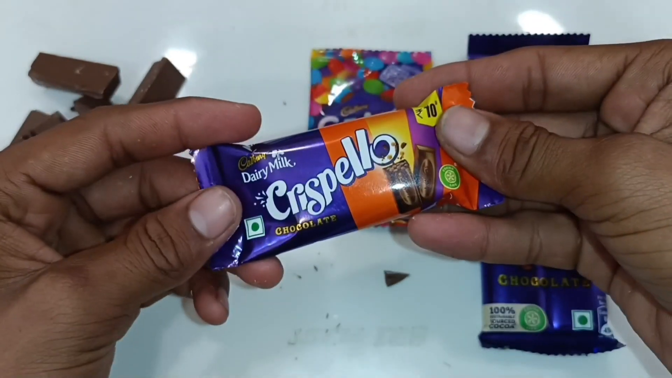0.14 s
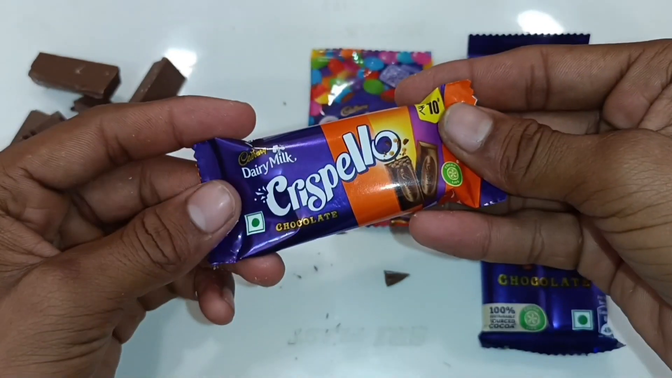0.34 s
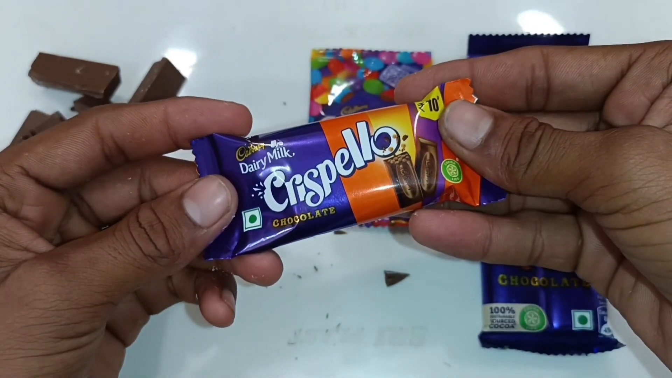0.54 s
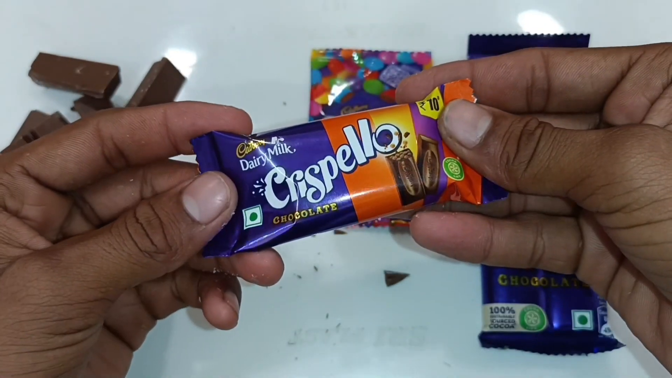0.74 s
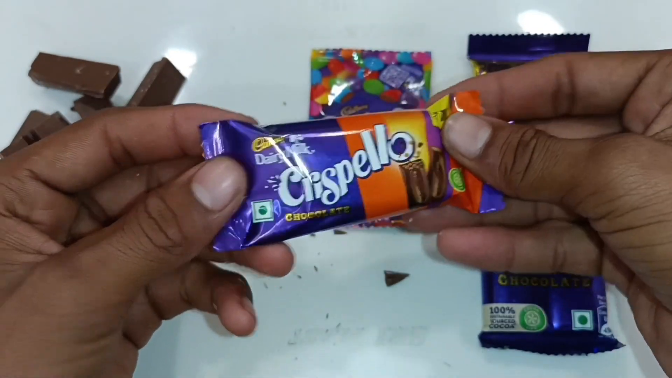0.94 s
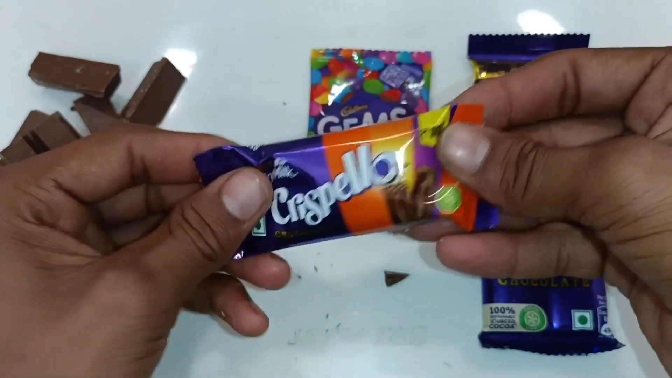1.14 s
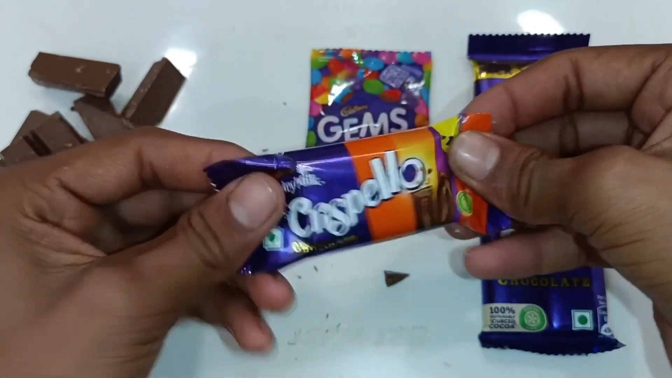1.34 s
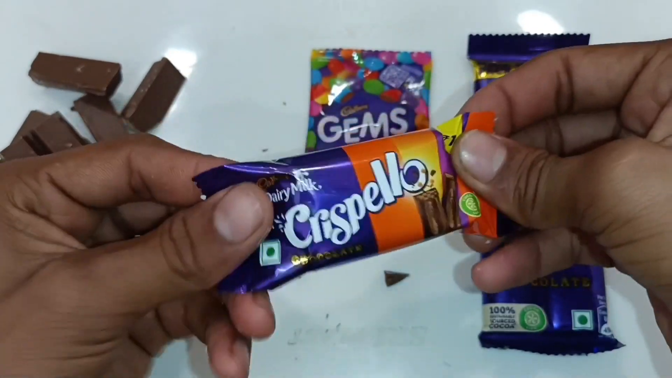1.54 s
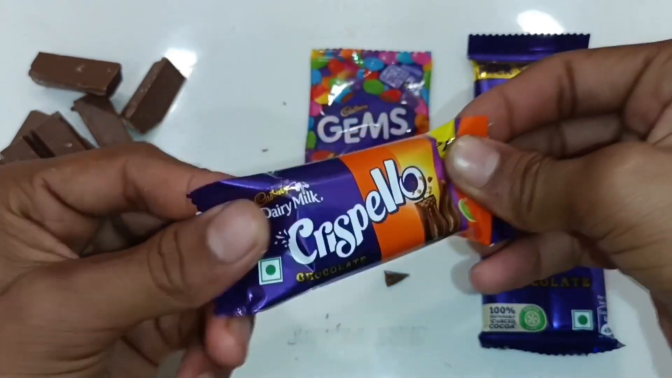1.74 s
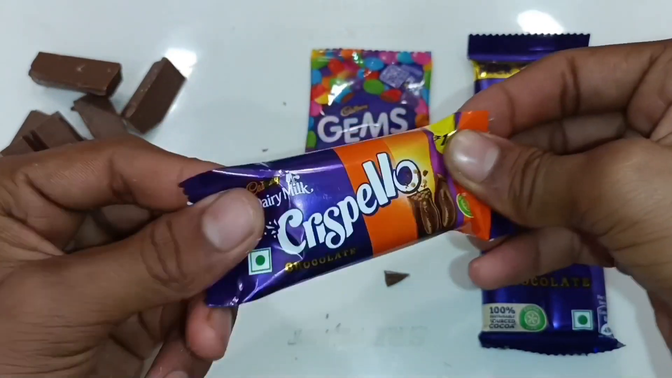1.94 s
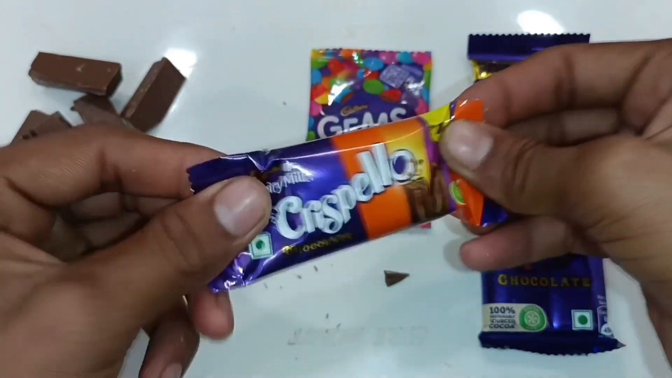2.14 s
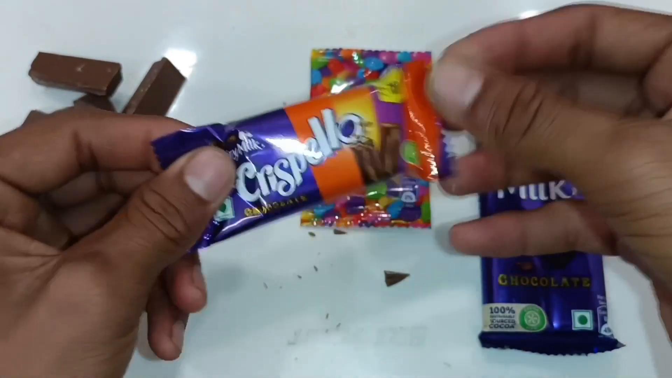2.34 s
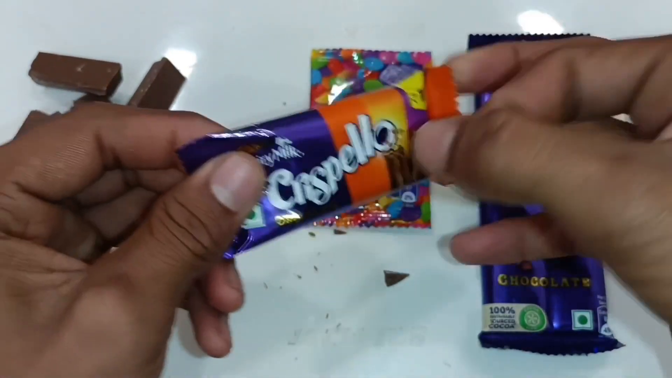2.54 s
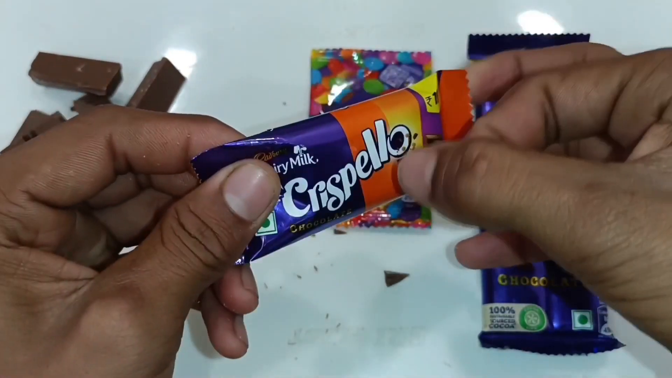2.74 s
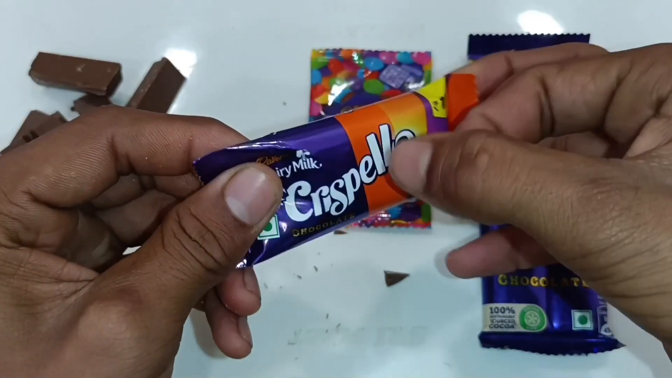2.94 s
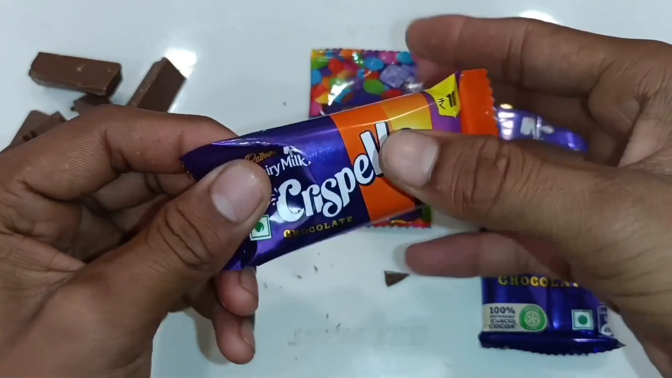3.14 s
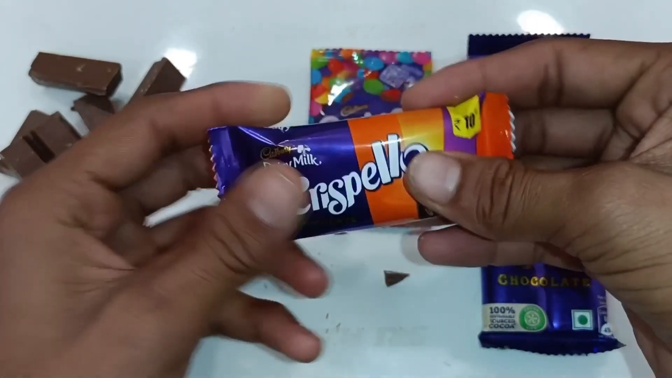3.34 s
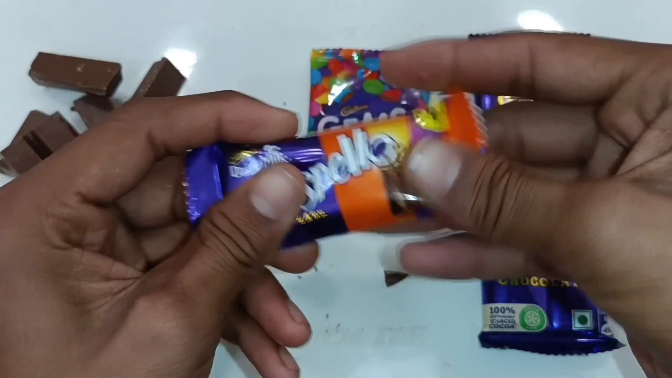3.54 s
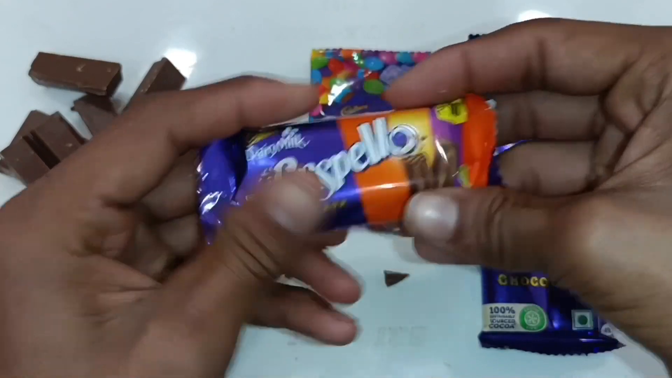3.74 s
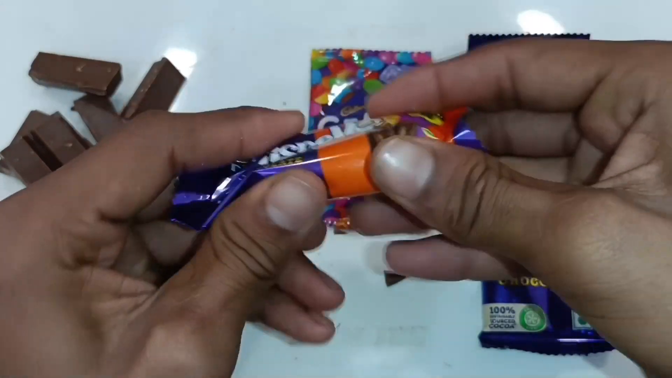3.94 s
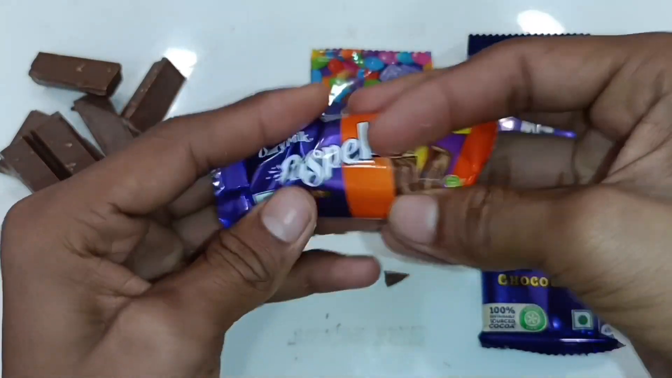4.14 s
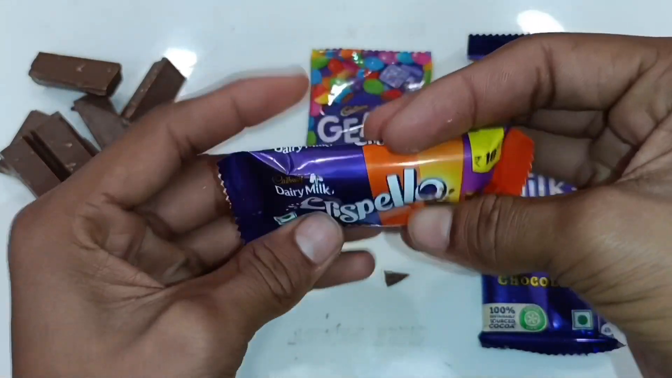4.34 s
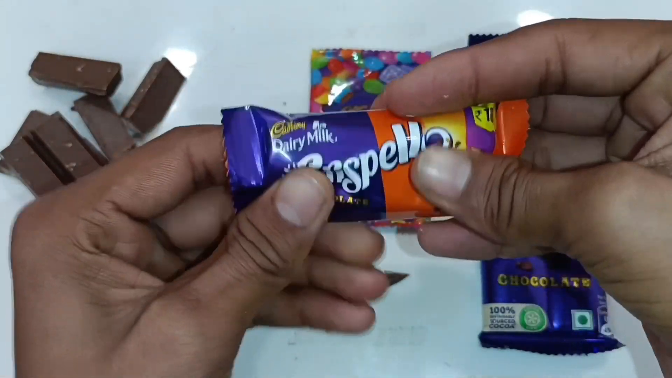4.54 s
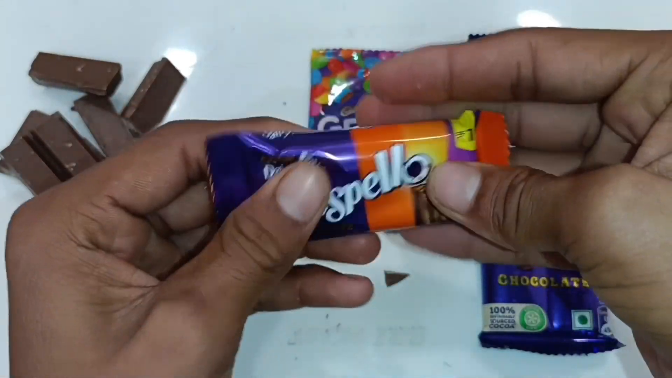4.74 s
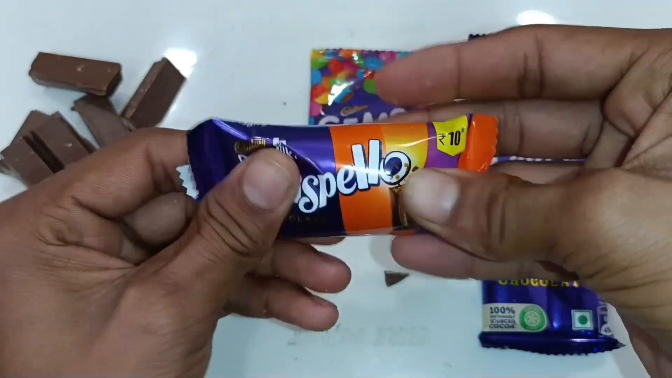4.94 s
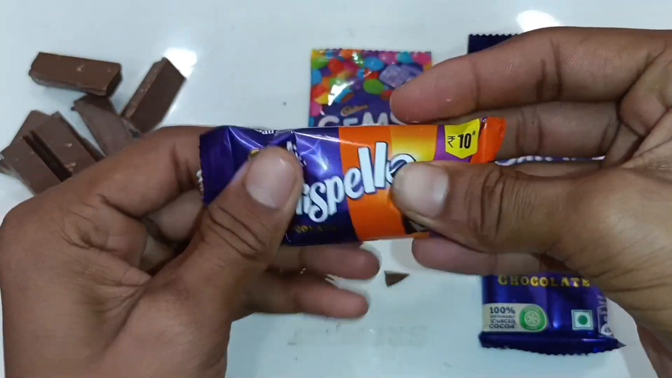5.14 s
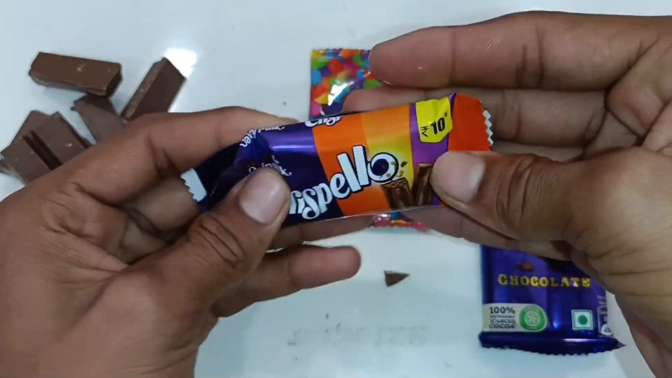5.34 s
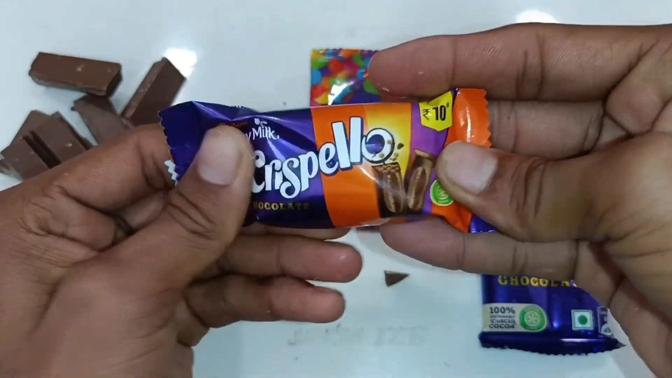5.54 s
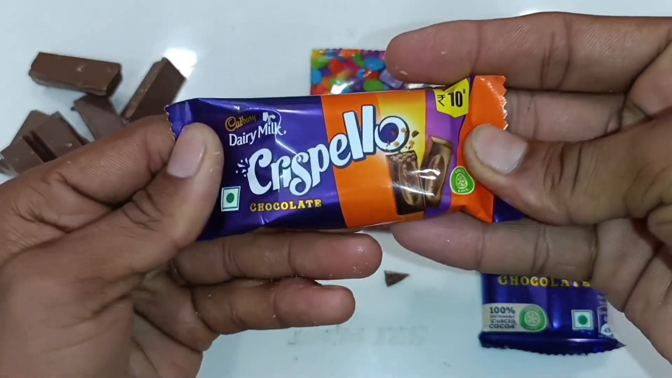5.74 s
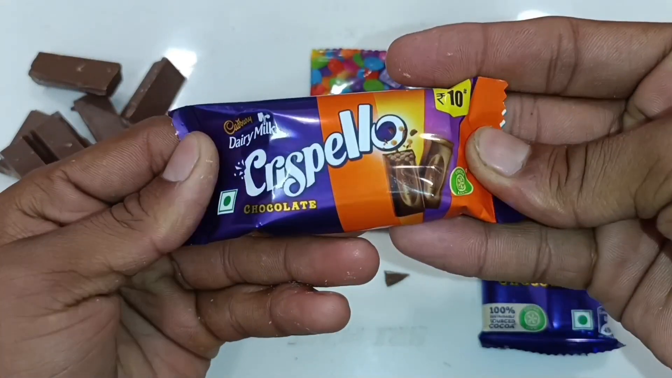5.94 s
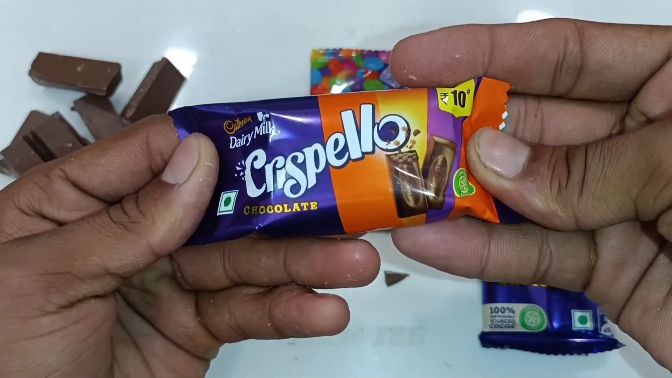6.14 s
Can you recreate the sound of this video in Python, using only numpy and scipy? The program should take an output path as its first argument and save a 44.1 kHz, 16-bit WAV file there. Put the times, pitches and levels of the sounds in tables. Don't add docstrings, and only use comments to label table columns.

```python
import sys
import numpy as np
from scipy import signal
from scipy.fft import rfft, irfft, next_fast_len
from scipy.io import wavfile
from scipy.ndimage import uniform_filter1d

SR = 44100
rng = np.random.default_rng(int(sys.argv[2]) if len(sys.argv) > 2 else 0)


def boost_factor(decibels):
    exponent = np.asarray(decibels, float) / 20
    return 10 ** exponent


def waveform_to_disk(signal):
    frames = np.transpose(np.atleast_2d(signal))
    scaled = np.clip(frames, -1, 1) * 32767
    samples = np.round(scaled).astype(np.int16)
    wavfile.write(sys.argv[1], SR, samples)


N = 272979
LENGTH = 1024
ATTACK = 0.0005

# frequency in Hz, level in dB per Hz.
FILM_COLOUR = [(180, -40), (300, -17), (1930, 11), (2560, -0.5), (2880, 7.5), (4530, -9.5), (8150, -3),
               (14400, -24), (16500, -36.5)]


def along(points, hz):
    f, v = np.transpose(points)
    return np.interp(np.log(hz + 1), np.log(f + 1), v)


def curve(rows):
    s, v = np.transpose(rows)
    return np.interp(np.arange(N) / SR, s, v)


def coloured(x, spectrum):
    m = next_fast_len(N + 8192)
    gain = boost_factor(along(spectrum, np.fft.rfftfreq(m, 1 / SR)))
    y = irfft(rfft(x, m) * gain, m)[:N]
    return y / np.sqrt(np.mean(y ** 2))


def resonance(f, hz, width_hz):
    return 1j * f * width_hz / (hz ** 2 - f ** 2 + 1j * f * width_hz)


def bursts(rise, t60, response, kick=0):
    t = np.arange(LENGTH) / SR
    core = boost_factor(-60 * t / (0.33 * t60))
    unzipping = boost_factor(-8 - 60 * t / t60)
    shape = (1 - np.exp(-t / rise)) ** 2 * (core + unzipping)
    noise = rng.standard_normal((len(t60), LENGTH)) * shape
    noise[:, round(rise * SR)] += kick
    rows = irfft(rfft(noise) * response(np.fft.rfftfreq(LENGTH, 1 / SR)), LENGTH)
    return rows / np.abs(rows).max(axis=1, keepdims=True)


def placed(times, rows):
    at = np.round(times * SR).astype(int)[:, None] + np.arange(rows.shape[1])
    return np.bincount(at.clip(0).ravel(), rows.ravel(), N + rows.shape[1])[:N]


def activity_db(x, span):
    width = int(span * SR)
    power = uniform_filter1d(uniform_filter1d(x ** 2, width), width)
    return 10 * np.log10(np.abs(power) + 1e-9)


def creases():
    # time in seconds, fizz in dB, panel ring in dB.
    clear_creases = [(0.9545, -16, -10.5), (0.9898, -4.5, -2.5), (0.996, -7, -28.5), (1.0351, -2, -10),
                     (1.0458, -16.5, -2), (1.0747, -2, -0.5), (1.0887, -41, -8), (1.0953, 3, -13.5),
                     (1.1153, -6, -3.5), (1.1331, -12.5, -2), (1.1399, 3.5, 1), (1.2332, -15.5, -4.5),
                     (1.2502, -3, -29.5), (1.2567, 1.5, -3.5), (1.281, -0.5, -27), (1.342, -2.5, -13.5),
                     (1.3509, -15.5, -7.5), (1.357, -20, -6), (1.369, -3, -11), (1.374, 6.5, 2.5),
                     (1.3865, -10.5, -11.5), (1.4008, -6, -13), (1.4044, -2.5, -8.5), (1.423, -5, -29.5),
                     (1.4688, 3.5, -7.5), (1.4747, -33.5, -3), (1.4919, -6.5, -18), (1.5092, -15.5, -12.5),
                     (1.55, -2.5, -12.5), (1.5714, 3, -4), (1.5954, -3.5, -4.5), (1.6092, 1.5, -1.5),
             (1.6171, 3.5, -6), (1.6782, 5.5, 1), (1.6972, 2.5, -11.5), (1.7057, -3.5, -8),
             (1.7143, -2.5, -13.5), (1.7225, -1, -22.5), (1.73, -0.5, -1.5), (1.764, -7, -3),
             (1.7853, -8.5, -18.5), (1.7973, -7, -17), (1.8033, -5, 3), (1.8107, 0.5, -8.5),
             (1.8264, -1.5, -4.5), (1.8364, 0.0, -7.5), (1.842, -4.5, -2), (1.9115, 7, -6),
             (1.9327, 1, -29.5), (1.9375, -11, -27), (1.964, -6.5, -4), (1.9711, -7, -9),
                     (2.024, -9, -2.5), (2.033, 4, -19), (2.0443, -14.5, -12), (2.054, 4, -21), (2.061, -8, -25),
            (2.073, -10.5, -11.5), (2.0889, -6.5, -19.5), (2.1157, 7, -8.5), (2.1211, -8, -12),
            (2.1265, 2.5, -12), (2.1421, -19, -31.5), (2.151, 0.5, -7), (2.162, 5.5, -3.5),
            (2.1987, -0.5, -6.5), (2.2913, -2, -16), (2.3084, -28.5, -13.5), (2.3639, -5.5, -14.5),
            (2.3719, -13.5, -12), (2.3799, -23, -9), (2.3906, -22, 2), (2.4035, 2, -5.5),
            (2.4092, -18.5, -7.5), (2.4294, -19, -12.5), (2.5205, -51, -19), (2.6067, -10, -8),
                     (2.8222, -6, -6), (2.833, -6.5, -7.5), (2.874, -7, -6), (2.8929, -12, -27.5),
             (2.909, -14, 0.5), (2.9808, -3, -4), (3.0313, -13, 1), (3.0349, 9.5, 3),
             (3.0414, -12.5, -14.5), (3.0538, -18, -21), (3.0896, -5.5, -19.5), (3.0943, 3.5, -3),
             (3.1009, -12, -6.5), (3.1102, -15.5, -14.5), (3.1275, -12.5, -23), (3.1403, -6.5, -3),
             (3.2507, -7.5, -12.5), (3.2735, -24.5, -14), (3.2842, -21, -19), (3.2899, -16, -3),
             (3.2998, 2.5, -22.5), (3.3194, -32, -14), (3.3283, -5.5, -21.5), (3.3535, -7.5, -8),
             (3.4034, -17, -9), (3.4228, 4, 0.5), (3.4443, 1.5, -5.5), (3.462, 7, -3), (3.4741, -2, -3),
                     (3.532, 6, 1), (3.5377, -5, -4.5), (3.5454, -0.5, -9.5), (3.565, 2.5, -15.5),
            (3.581, 3.5, -20.5), (3.6686, -7, -4), (3.7014, -1, -7), (3.713, 1.5, -8), (3.7279, 3.5, 3),
            (3.7414, 2, -15), (3.7518, 6.5, -5.5), (3.7568, -6.5, -6), (3.7769, 1.5, 2), (3.7925, -3.5, -2),
            (3.8024, -3.5, -13.5), (3.8284, 2.5, -9.5), (3.849, -4, -14.5), (3.8649, -14.5, -3),
            (3.8995, -4.5, -13), (3.9169, -0.5, -20.5), (3.919, -0.5, -0.5), (3.9806, -4.5, 2),
            (3.9963, -8.5, 1.5), (4.0036, 1.5, -8.5), (4.0125, 3.5, -6), (4.0192, -14.5, 0.5),
            (4.0382, -0.5, -21), (4.0479, -3, -2), (4.0834, -2, -0.5), (4.0891, 6, 2.5),
                     (4.177, -2, -2.5), (4.2088, -33.5, -7), (4.2242, -12.5, -10.5), (4.2413, -6.5, -6),
                 (4.2696, -11, -20.5), (4.2779, -3.5, -8.5), (4.2941, -2.5, -2), (4.3147, 4.5, -17.5),
                 (4.3442, -9.5, -10), (4.3526, -4.5, -12.5), (4.4, -12, -0.5), (4.4054, 1, -27),
                 (4.4085, -22.5, -6), (4.423, -2, -9), (4.426, -5, -15.5), (4.4717, -1, -28),
                 (4.4851, 5, -12), (4.5035, 2.5, -7), (4.5522, -4, -10), (4.579, -5.5, -15.5),
                 (4.589, 3, -2.5), (4.6012, 5.5, -5), (4.6387, -8, -26.5), (4.6499, 4, -2.5),
                     (4.6961, -14.5, -7), (4.7084, 2, -10), (4.7122, 4, -1), (4.7226, -0.5, -0.5), (4.7267, 0, 1.5),
             (4.7316, 1, 0.5), (4.7619, -5.5, -2.5), (4.7654, 1.5, -7), (4.77, 1.5, -2), (4.7861, 0.5, -9),
             (4.8166, 4.5, 2.5), (4.8387, -7.5, -5), (4.8589, -11.5, -9), (4.8692, 0, -14),
             (4.9213, -1.5, -23.5), (4.9944, -16, -25), (5.0673, -7, -18.5), (5.0976, -20, -12),
             (5.1258, 4, -0.5), (5.1522, -0.5, -15.5), (5.1659, -2.5, -0.5), (5.1963, 2.5, 1),
             (5.201, -7, -12), (5.2093, 1, -1.5), (5.216, 7.5, -4), (5.225, -9.5, -7.5), (5.2346, 0, -20.5),
                     (5.2637, -4.5, -22.5), (5.2715, 2, -16), (5.3141, -6, -31.5), (5.3223, -7, -8),
              (5.3277, 3.5, -4), (5.3435, 2, -25.5), (5.3741, 6.5, 0.5), (5.4103, -19.5, -7.5),
              (5.4204, 1, -21.5), (5.431, 6.5, -1.5), (5.4402, -8, -26.5), (5.445, 1.5, -16.5),
              (5.4907, -8, -9.5), (5.5665, -1, -1.5), (5.571, -1, -20.5), (5.5838, -17.5, -8),
              (5.5878, -3, -32), (5.6164, 0.5, -12.5), (5.622, -2, -24), (5.6534, -2, -48),
              (5.7078, -3.5, 4), (5.726, -24.5, -38), (5.815, -9, -24.5), (5.832, -18.5, -21.5)]
    # time in seconds, fizz in dB, panel ring in dB.
    pauses = [(0.0565, -10.5, -14), (0.158, -54.5, -43), (0.1706, -55.5, -47), (0.7822, -61, -56),
              (0.792, -71, -43), (0.8045, -51, -48), (5.8815, -46, -70), (5.912, -49.5, -60),
              (0.9284, -54, -41), (0.9459, -41.5, -29.5), (5.996, -34, -63), (6.0222, -47, -50),
              (6.0468, -48.5, -59), (6.0765, -45, -61), (6.108, -48, -55), (6.1734, -20.5, -40),
              (6.1824, -14.5, -44), (3.6481, -6.5, -14.5)]
    # time in seconds, fizz in dB, panel
    # ring in dB.
    ticks = [(0.9499, -44, -32), (1.0261, -14, -19.5), (1.1027, -20, -4.5), (1.1644, -10, -24),
             (1.2694, -21, -17), (1.3593, -10, -18.5), (1.3804, -13.5, -19.5), (1.4268, -9, -17.5),
             (1.4628, -15, -21.5), (1.4973, -19, -15), (1.504, -10, -18), (1.5919, 0.5, -20.5),
             (1.7394, -18.5, -3), (1.7542, -3, -20), (1.7595, -19.5, -19.5), (1.7766, -14.5, -22.5),
             (1.8511, -7.5, -8.5), (1.855, -12.5, -15), (2.0084, -12.5, -18.5),
             (2.0183, -17.5, -23.5), (2.0353, -4, -13), (2.2956, -8.5, -22), (2.302, -19.5, -18.0),
             (2.3453, -28, -24), (2.8588, -20.5, -21), (2.867, -18, -19.5), (2.9041, -26.0, -9.5),
             (3.0438, -15.0, -6.5), (3.244, -18.5, -16), (3.419, -28.5, -21), (3.4952, -11, -23.0),
             (3.5757, -8, -7), (3.623, -13, -25.5), (3.666, -5.5, -19.5), (3.6856, -13.5, -30),
             (3.6932, -11.5, -29), (3.7322, 2, -11.5), (3.785, -7, -19), (3.8243, 1, -22.5),
             (3.8424, -12, -8), (3.8777, -11.5, -11), (3.9045, -12, -3), (3.9697, -21.5, -12),
                  (3.9906, -10.5, -5.0), (3.994, -3, -5), (4.0235, -8, -12), (4.1652, -22, -19),
                  (4.2024, -12.5, -23.0), (4.2285, -17.5, -19), (4.2562, -17, -16), (4.287, -11.5, -25),
                  (4.2923, -13, -5), (4.3075, -11, -24), (4.394, -21.5, -17), (4.436, -11.5, -32),
                  (4.4926, -12.5, -19), (4.6657, -13.5, -14), (4.6917, -20.5, -26), (4.7032, -7.5, -17),
                  (4.7445, -2, -19), (4.806, -7.5, -19.0), (4.8666, 2.5, -24), (4.8895, -13, -25),
                  (4.9022, -15.5, -26.0), (4.9367, -8.0, -33), (5.0324, -24, -35.5), (5.1047, -12.5, -24.5),
                  (5.1127, -12.5, -29), (5.121, -16.5, -16.5), (5.1425, -10.5, -21.5),
                  (5.1565, -9.5, -18.0), (5.2412, -15, -22.5), (5.3995, -12.5, -17), (5.4489, -2.5, -8.5),
                  (5.5092, -9.5, -23), (5.521, -16, -23.5), (5.768, -30, -18), (6.1175, -50, -62)]
    # time in seconds, pouch level in dB, pouch
    # pitch in Hz.
    thumps = [(0.057, -22.5, 910), (0.954, -22.5, 800.0), (0.99, -18, 1330), (1.078, -15.0, 820.0),
              (1.115, -14.5, 1064), (1.133, -12.5, 1040.0), (1.25, -16.0, 946), (1.355, -14.5, 1144),
              (1.469, -18, 1124), (1.572, -16.5, 894), (1.609, -17, 876), (1.678, -19, 1028),
              (1.73, -16.5, 1245), (1.835, -19.5, 1170.0), (2.033, -23.5, 787), (2.162, -19.5, 1010),
              (2.393, -15.5, 1424), (2.606, -20.0, 557), (2.822, -13.5, 770), (2.892, -15, 1440),
              (2.981, -12.5, 960.0), (3.032, -9, 808), (3.14, -10.0, 1005), (3.423, -12.5, 970),
              (3.462, -14, 1407), (3.668, -13, 930), (3.712, -12.5, 803), (3.753, -17, 1124),
              (3.776, -12.5, 1406), (3.996, -16, 996), (4.005, -12.5, 737), (4.013, -12, 854),
              (4.4, -21, 900.0), (4.503, -17.5, 903), (4.589, -16, 1050), (4.603, -15, 953),
              (4.697, -9.5, 750), (4.721, -25.5, 1004), (4.816, -16, 933), (4.92, -19.5, 977),
              (5.126, -20.5, 1150), (5.215, -20, 1400.0), (5.328, -14.5, 1320), (5.583, -21.5, 1350),
              (5.708, -23, 753),
              (0.159, -44, 950), (0.1707, -42, 950), (0.792, -43.5, 1050), (3.2741, -12, 880),
                    (4.257, -15.5, 1040), (2.3453, -19.5, 844)]
    # time in seconds, panel pitch in Hz.
    panel = [(0.99, 2074), (1.115, 2080), (1.133, 2264), (1.143, 2580), (1.469, 1940), (1.572, 2780),
             (1.61, 1930), (1.618, 3460), (1.681, 3930), (1.731, 2970), (1.81, 1940), (1.835, 3940),
             (1.842, 2920), (1.972, 4900), (2.024, 2735), (2.163, 2790), (2.381, 2660), (2.395, 2940),
             (2.405, 2810), (2.981, 2290), (3.035, 2470), (3.42, 2490), (3.465, 2177), (3.67, 2850),
             (3.712, 1840), (3.751, 3000), (3.758, 1460), (3.778, 2220), (3.792, 2300), (3.923, 2237),
             (3.982, 2060), (3.991, 2110), (3.996, 2110), (4.003, 1970), (4.019, 2870), (4.047, 1990),
             (4.083, 2106), (4.09, 2090), (4.179, 1790), (4.4, 2150), (4.589, 2080), (4.602, 1830),
             (4.649, 3500), (4.713, 2180), (4.723, 2070), (4.734, 2910), (4.766, 2980), (4.816, 2435),
             (4.839, 1967), (5.126, 2760), (5.166, 4940), (5.196, 2090), (5.209, 2950), (5.216, 2880),
             (5.226, 2850), (5.33, 4210), (5.375, 2320), (5.434, 2380), (5.566, 2810), (5.709, 2344),
             (0.955, 2320), (1.035, 4880), (1.095, 3010), (1.359, 3600), (1.376, 2810), (1.401, 2980),
                  (1.406, 4170), (1.764, 3860), (1.912, 2915), (2.116, 3570), (2.127, 3030), (2.43, 2120),
                  (2.823, 2630), (2.833, 2860), (2.874, 2570), (2.892, 2890), (2.909, 2870), (3.045, 2730),
                  (3.054, 2770), (3.095, 2930), (3.141, 2800), (3.445, 1577), (3.474, 2860), (3.533, 4930),
                  (3.538, 2690), (3.728, 1950), (4.243, 2120), (4.298, 2900), (4.409, 2284), (4.504, 2780),
                  (4.787, 2910), (4.86, 2730), (5.099, 2090), (5.152, 2800), (5.45, 4070), (5.617, 2070),
             (0.057, 2910), (2.521, 2664), (2.607, 1836), (5.833, 3840), (5.769, 2320), (5.816, 2250)]

    clear = clear_creases
    s, fizz_db, ring_db = np.transpose(pauses + clear + ticks)
    luck = rng.standard_normal((len(s), 3))
    pouch_db = ring_db - 13 - 8 * np.abs(luck[:, 0])
    pouch_hz = 950 * np.exp(0.15 * luck[:, 2])
    pitches = panel
    panel_hz = np.interp(s, *np.transpose(sorted(pitches))) * np.exp(0.15 * luck[:, 1])
    for at, db, hz in thumps:
        nearest = np.abs(s - at).argmin()
        pouch_db[nearest], pouch_hz[nearest] = db, hz
    for at, hz in pitches:
        panel_hz[np.abs(s + 2 * ATTACK - at).argmin()] = hz
    return np.array([s, fizz_db - 5, ring_db - 2.5, panel_hz, pouch_db + 5.5, pouch_hz])[..., None]


def snaps():
    # frequency in Hz, level in dB per Hz.
    fizz_colour = [(150, -42), (2350, -8), (4000, -6), (5840, -6), (9000, 2.5), (11000, -5.5), (14800, -13),
                   (16500, -20)]
    s, fizz_db, ring_db, panel_hz, pouch_db, pouch_hz = creases()
    luck = rng.standard_normal((len(s), 1))
    peak_db = np.maximum(fizz_db, ring_db)
    spread = np.exp(0.21 * luck + 0.0041 * (peak_db + 27.5))
    drive_db = 0.46 * np.maximum(peak_db + 6.0, 0)

    def sound(time, ring_width_hz, pouch_width_hz, drive_db, kick):
        def film(f):
            return resonance(f, panel_hz, ring_width_hz) ** 2 * resonance(f, 1700, 4400)

        def air(f):
            return resonance(f, pouch_hz, pouch_width_hz) ** 2

        fizz = bursts(ATTACK / 2, 0.012 * time, lambda f: boost_factor(along(fizz_colour, f)), 0.77 * kick)
        ring = bursts(ATTACK, 0.02 * time, film, 3 * kick)
        pouch = bursts(2 * ATTACK, 0.018 * time, air, 5 * kick)
        mix = boost_factor(fizz_db + 3.5) * fizz + boost_factor(ring_db - 0.5) * ring + boost_factor(pouch_db - 5.0) * pouch
        return boost_factor(drive_db) * mix

    far = sound(0.36 * spread, 990, 990, 0.32 * drive_db, 30)
    near = sound(spread, 1100, 600, drive_db, 1.88)
    return s[:, 0] - ATTACK, near, far


def crackle(snapped):
    settling = signal.fftconvolve(snapped ** 2, np.hanning(2 * LENGTH))[:N] / LENGTH
    luck = rng.random((3000, 4))
    s = luck[:, 0] * (N - 1) / SR
    centre_hz = np.where(luck[:, 1:2] < 0.45, 8700, 2500)
    hz = centre_hz * np.exp(luck[:, 2:3] - 0.5)

    def patch(f):
        return boost_factor(along(FILM_COLOUR, f)) * (0.5 + resonance(f, hz, 0.53 * hz))

    rows = bursts(ATTACK, np.full(hz.shape, 0.005), patch, kick=2.3)
    uneven = boost_factor(-10 - 4.0 * np.log(luck[:, 3] + 0.0098))
    size = np.sqrt(np.abs(settling[(s * SR).astype(int)])) * uneven
    return placed(s, size[:, None] * rows)


def puffs():
    # time in seconds, peak in dB.
    pushes = [(1.142, -25), (1.2825, -22.5), (1.4694, -27), (1.9149, -27), (3.0308, -21), (3.4244, -22.5),
              (3.4652, -24), (3.5323, -50), (3.804, -29), (4.298, -19.5), (4.4851, -27), (4.717, -28.5),
              (5.199, -25), (5.4291, -32)]
    s, db = np.transpose(pushes)
    push_time = 0.0006 * np.exp(0.058 * rng.standard_normal((len(s), 1)))
    u = np.arange(2 * LENGTH) / SR / push_time
    push = u * (1 - u / 2) * np.exp(1 - u) * 2
    return placed(s - 0.0015, boost_factor(db + 8.0)[:, None] * push)


def echoes(x):
    # delay in seconds, level in dB.
    surfaces = [(.009, -26.5), (0.0179, -22), (0.0257, -36), (.032, -58)]
    return sum(boost_factor(db) * np.pad(x, (round(delay * SR), 0))[:N] for delay, db in surfaces)


def wall_tail():
    # frequency in Hz, 60 dB decay time in seconds.
    decay = [(150, 0.78), (1000, 0.17), (3000, 0.32), (9000, 0.33), (11500, 0.57), (15000, 0.18)]
    # frequency in Hz, level in dB.
    wall_tone = [(200, -4), (1000, 15), (3000, 3), (5500, 8), (9000, 6.5), (11500, 0.5), (15000, 8.5),
                 (15500, -32)]
    hz, t, z = signal.stft(rng.standard_normal(SR // 2), SR, nperseg=256)
    level_db = along(wall_tone, hz)[:, None] - 60 * t / along(decay, hz)[:, None]
    tail = signal.istft(z * boost_factor(level_db), SR, nperseg=256)[1]
    t = np.arange(len(tail)) / SR
    joining = 0.63 + 0.33 / (1 + np.exp((0.017 - t) / 0.00087))
    tail = tail * joining * (1 - np.exp(-t / 0.0033))
    tail = tail * boost_factor(-12 * np.exp(-t / 0.19))
    return tail / np.linalg.norm(tail)


def suppressed(x, knee_db):
    return x * boost_factor(np.clip(1.6 * (activity_db(x, 0.016) - knee_db), -12, 0))


def room_noise(busy_db):
    # time in seconds, level in dB.
    handling = [(0, -73), (.2, -63), (.3, -103), (.42, -73.5), (.62, -94), (.76, -75), (.84, -71),
                (.92, -66.5), (5.9, -79.5), (6.19, -78)]
    # frequency in Hz, level in dB per Hz.
    hush = [(18, -46.5), (30, -6.5), (134, 3.5), (1040, -4.5), (5040, -14.5), (8980, -27), (16000, -17)]
    # frequency in Hz, level in dB per Hz.
    stir = [(25, -38), (60, -9.5), (130, -2), (400, -10), (900, -12), (3000, -120)]
    open_db = np.clip(1.22 * (busy_db + 24.0), -30, 0)
    rumble = boost_factor(-50.0 + open_db) * coloured(rng.standard_normal(N), stir)
    rub = boost_factor(curve(handling)) * coloured(rng.standard_normal(N), FILM_COLOUR)
    hiss = boost_factor(-78.5) * coloured(rng.standard_normal(N), hush)
    return hiss + rumble + rub


def port(x):
    m = next_fast_len(N + LENGTH)
    cavity = resonance(np.fft.rfftfreq(m, 1 / SR), 8620, 910)
    return irfft(rfft(x, m) * (1 + boost_factor(-8.5) * cavity), m)[..., :N]


def scene():
    s, near, far = snaps()
    wet = np.zeros(N)
    for k in range(6):
        wet += signal.fftconvolve(placed(s[k::6], far[k::6]), wall_tail())[:N]
    direct = placed(s, near)
    small = crackle(direct)
    small_wet = signal.fftconvolve(small, wall_tail())[:N]
    wet = boost_factor(-12.0) * wet + boost_factor(-11.5) * small_wet + echoes(direct)
    low = signal.sosfiltfilt(signal.butter(2, 3600, fs=SR, output="sos"), wet)
    tails = suppressed(low, knee_db=-53) + suppressed(wet - low, knee_db=-49.5)
    busy_db = np.roll(activity_db(wet, 0.039), LENGTH // 2) + 16.5
    return (direct + small + tails + puffs() + room_noise(busy_db))[None]


def band_limit(x):
    return signal.sosfilt(signal.butter(12, 16620, fs=SR, output="sos"), x)


def record(dry):
    dry = port(dry)
    clipped = dry / (1 + np.abs(dry / 0.97) ** 12) ** (1 / 12) - 0.00012
    smooth = signal.sosfiltfilt(signal.butter(12, 16200, fs=SR, output="sos"), clipped)
    return band_limit(smooth)


dry = scene()
out = record(dry)
waveform_to_disk(out)
```